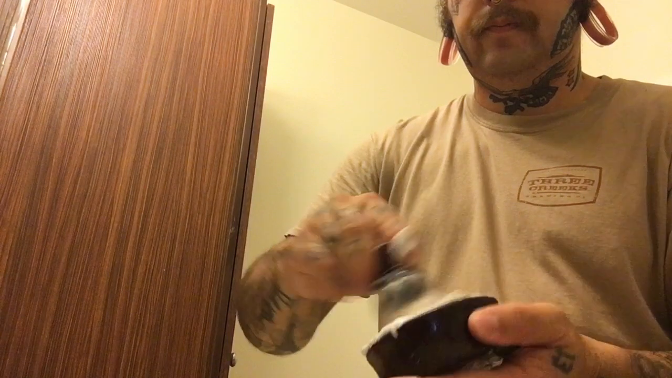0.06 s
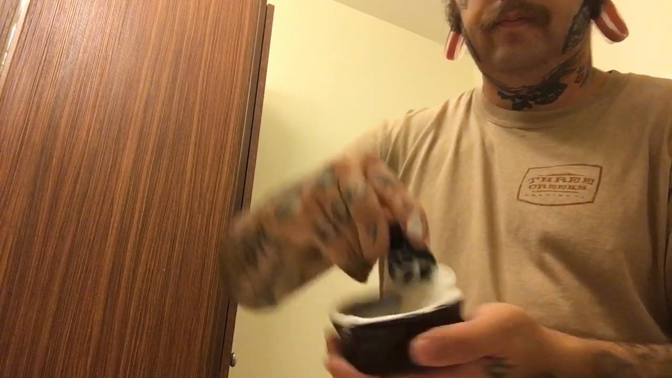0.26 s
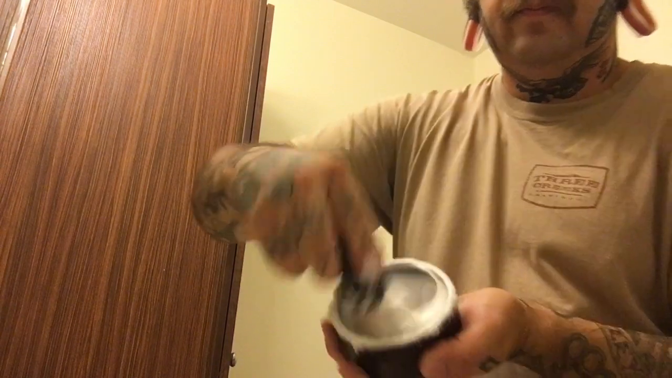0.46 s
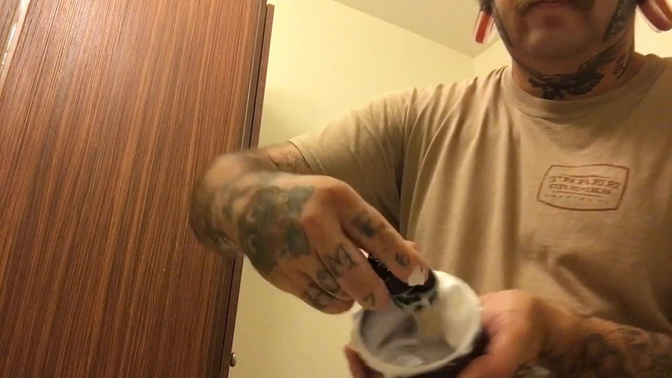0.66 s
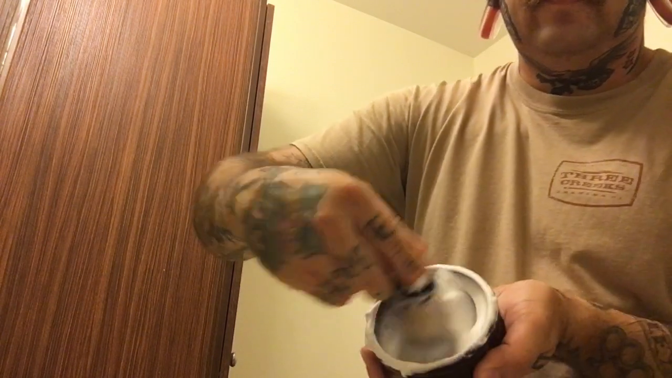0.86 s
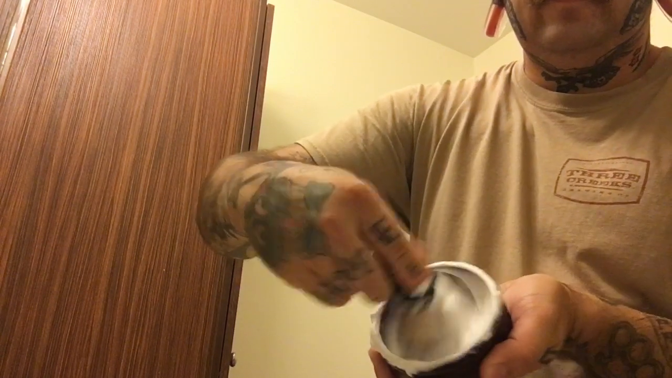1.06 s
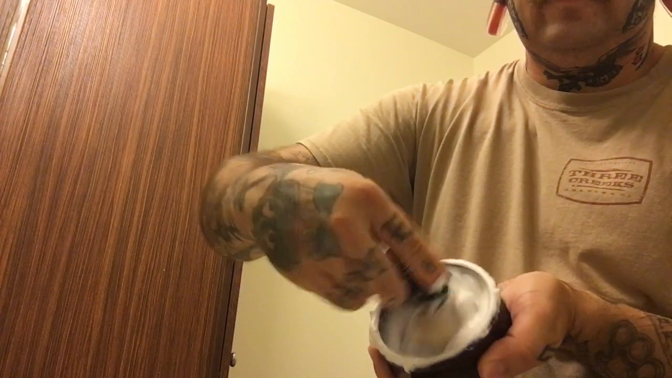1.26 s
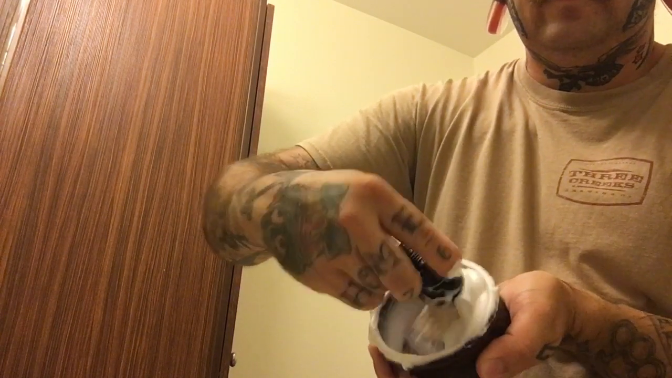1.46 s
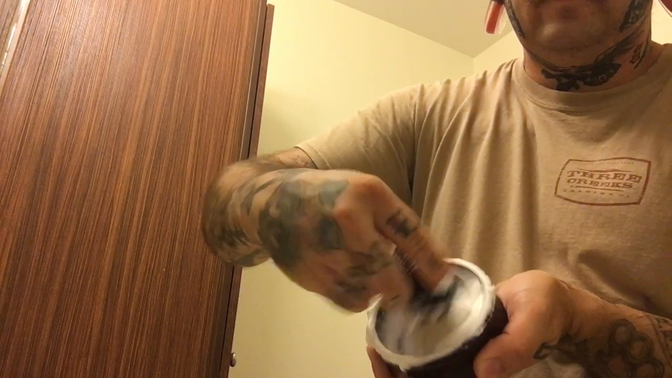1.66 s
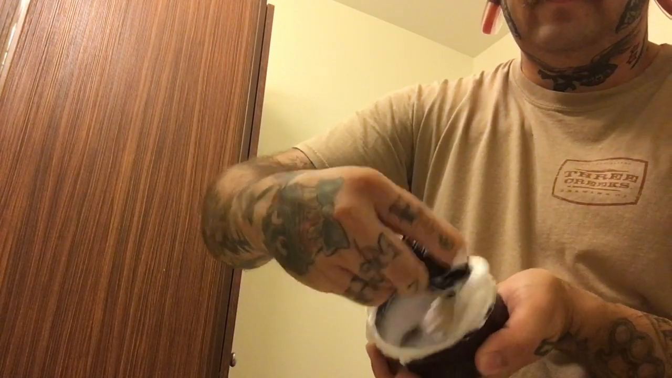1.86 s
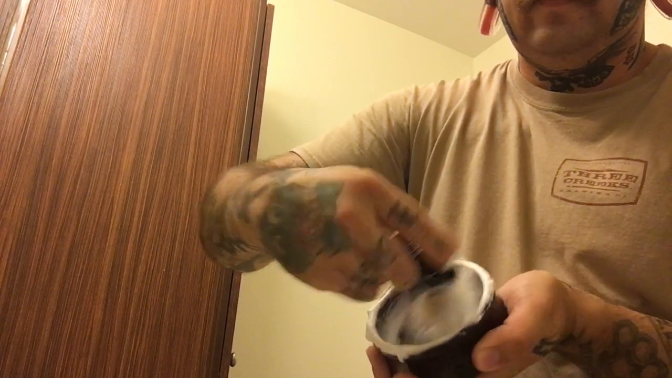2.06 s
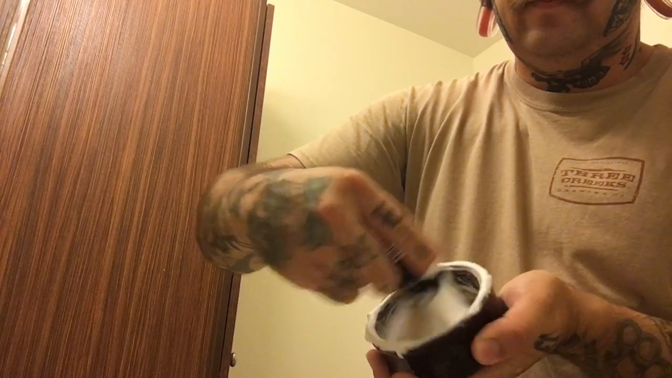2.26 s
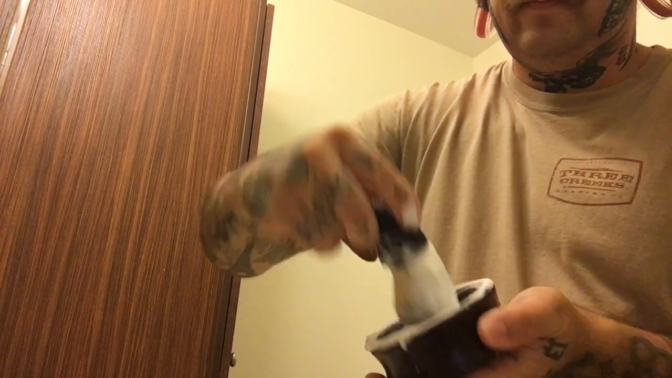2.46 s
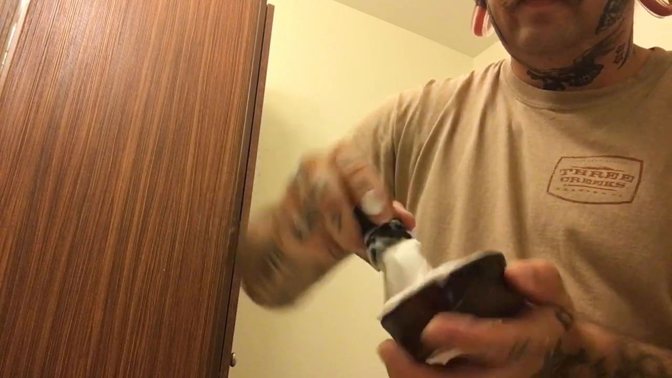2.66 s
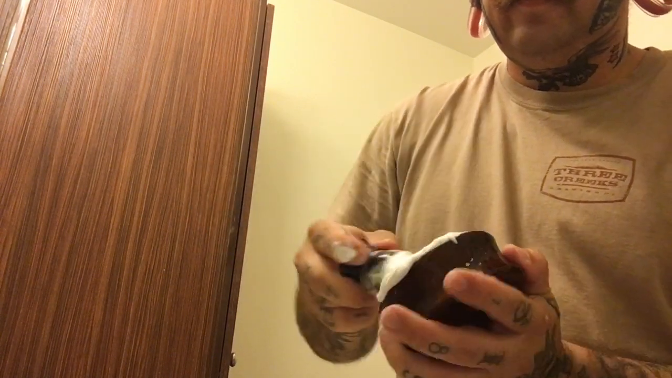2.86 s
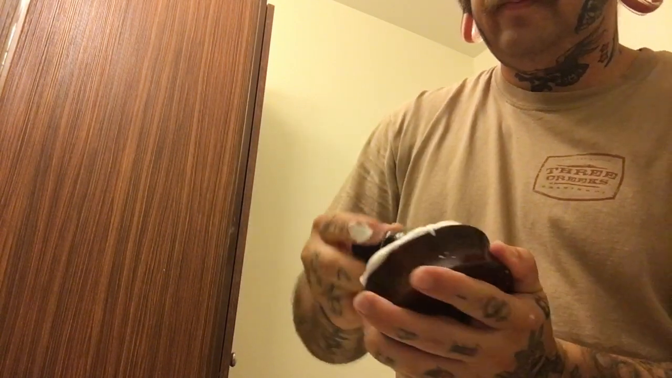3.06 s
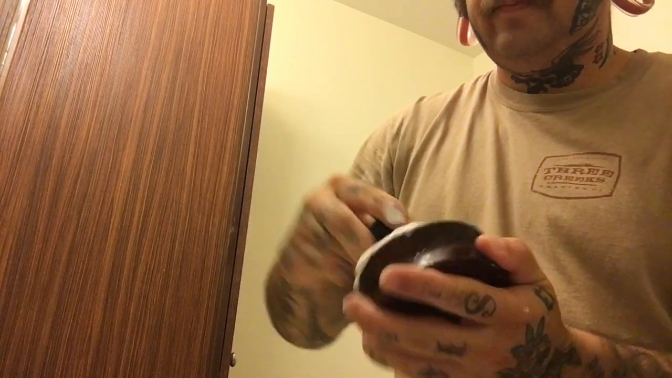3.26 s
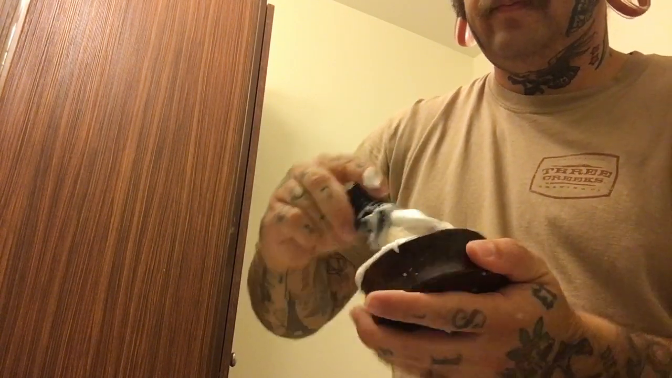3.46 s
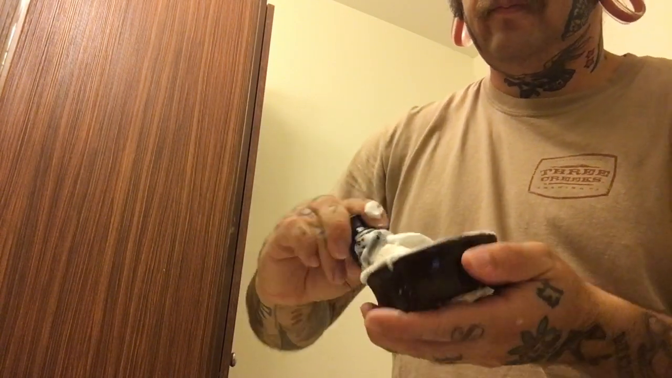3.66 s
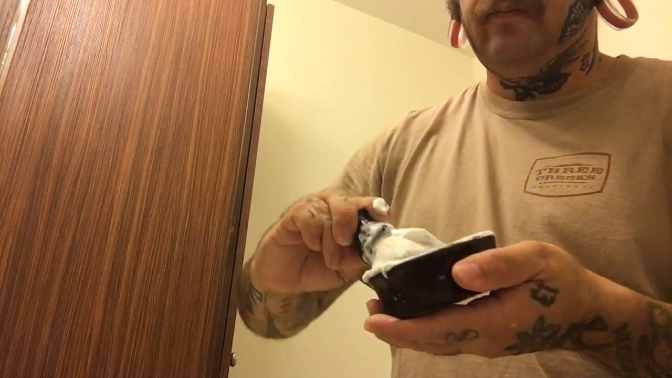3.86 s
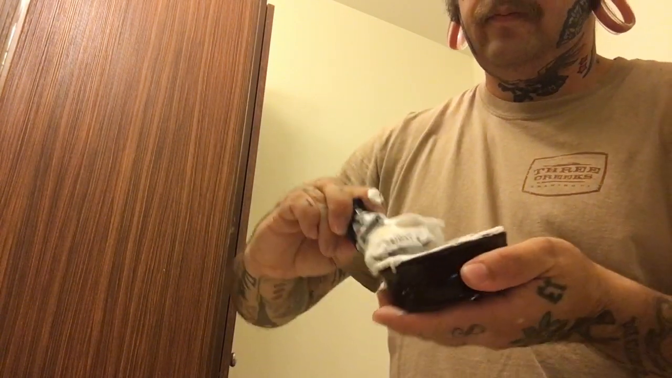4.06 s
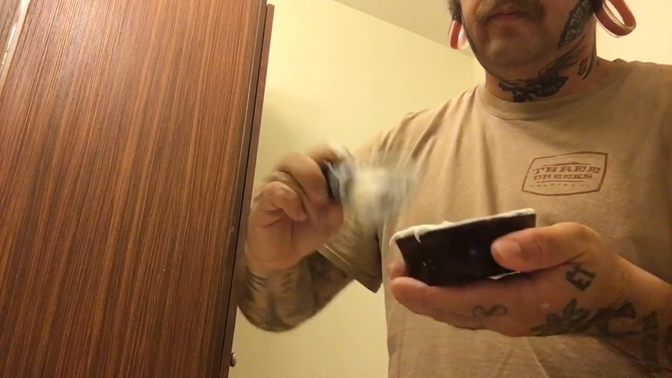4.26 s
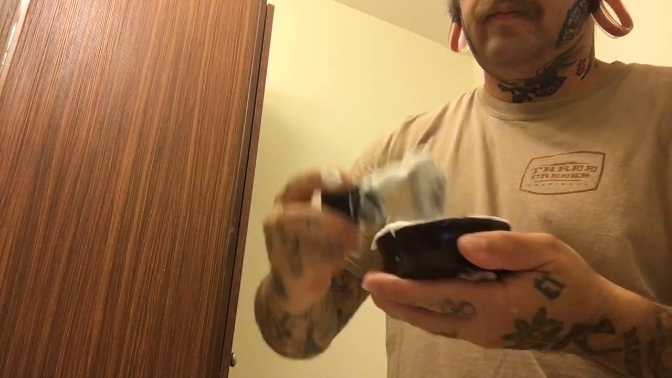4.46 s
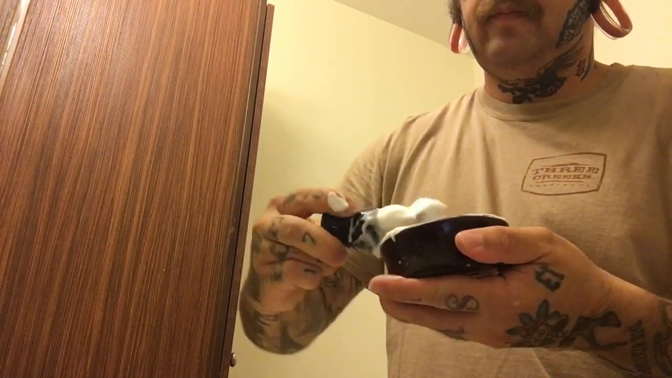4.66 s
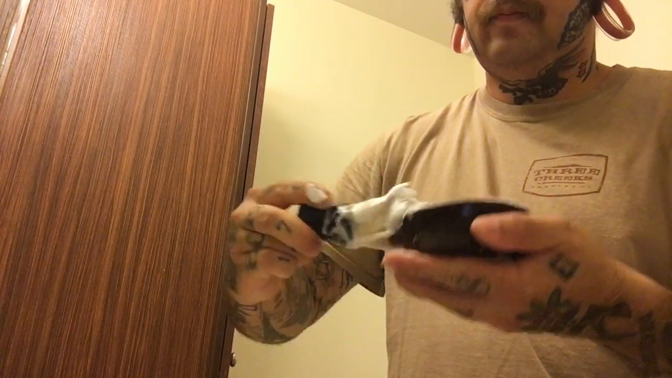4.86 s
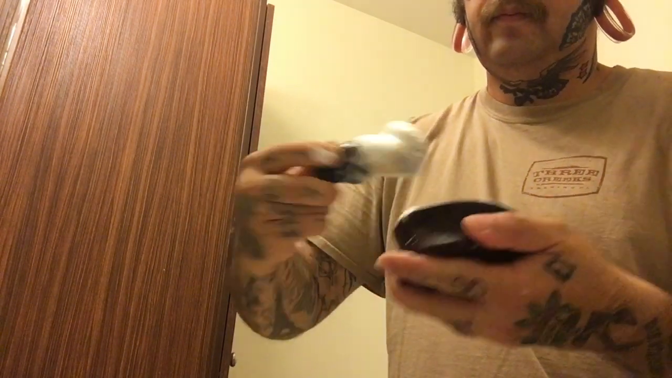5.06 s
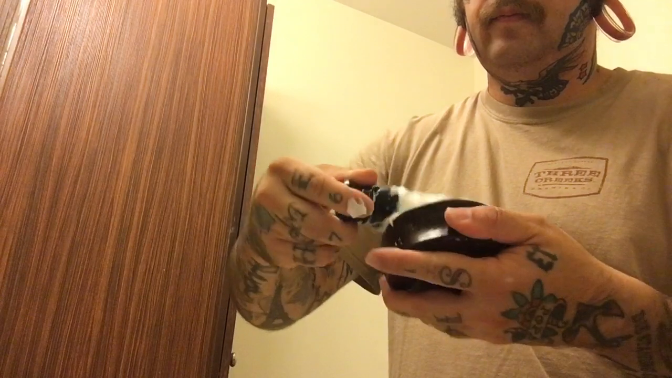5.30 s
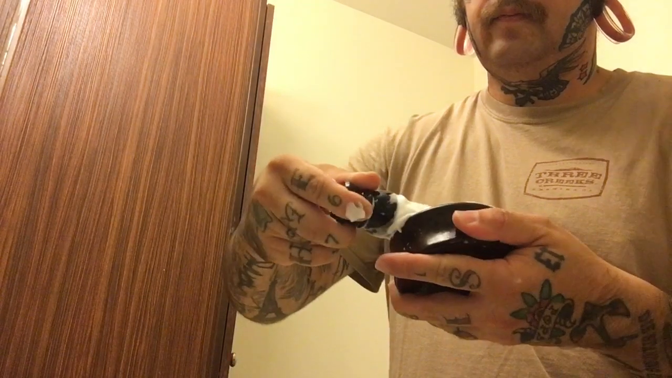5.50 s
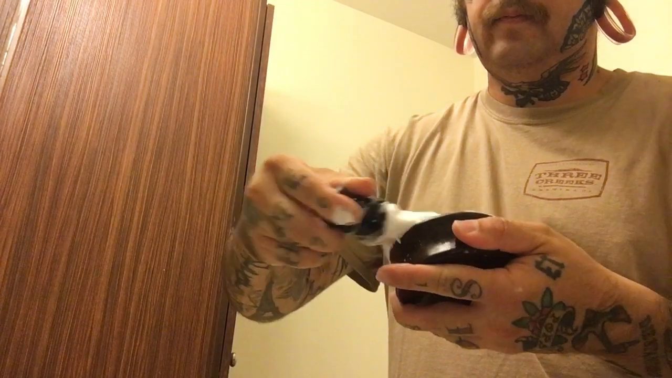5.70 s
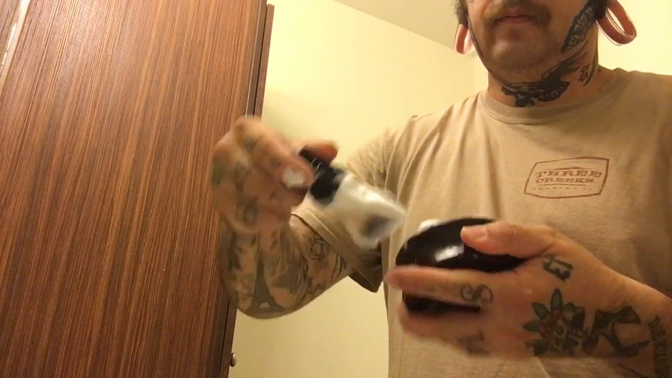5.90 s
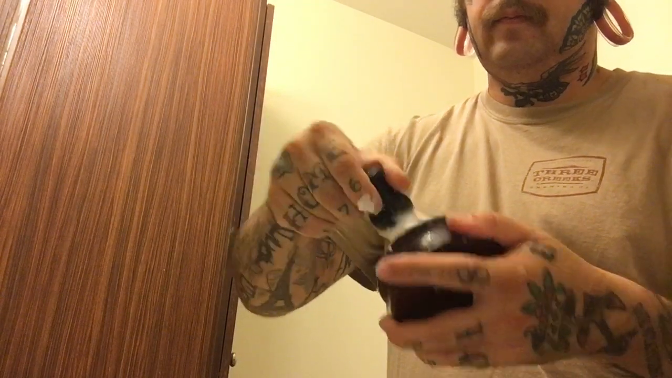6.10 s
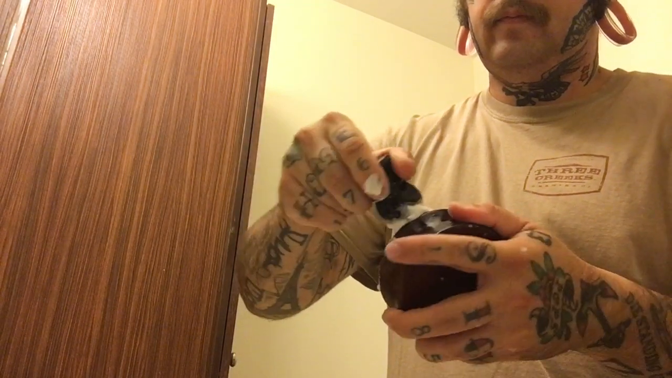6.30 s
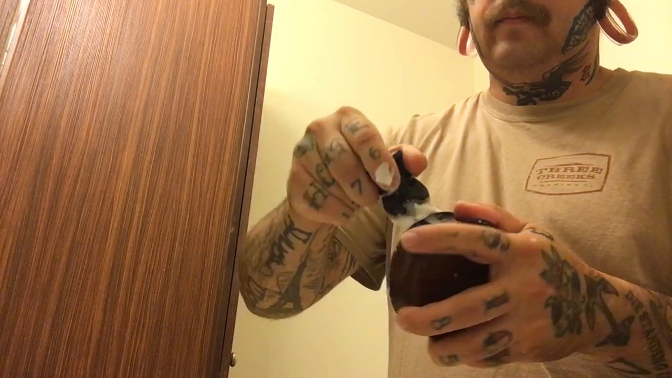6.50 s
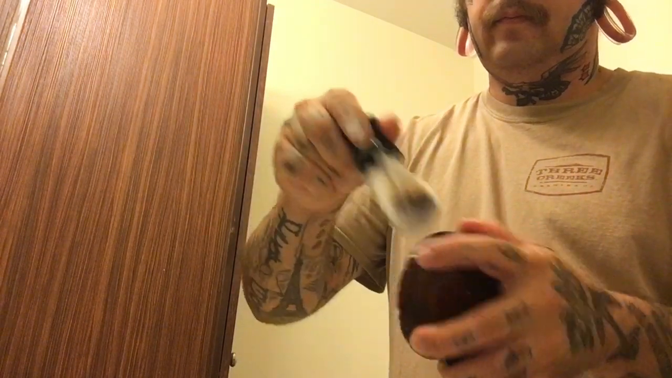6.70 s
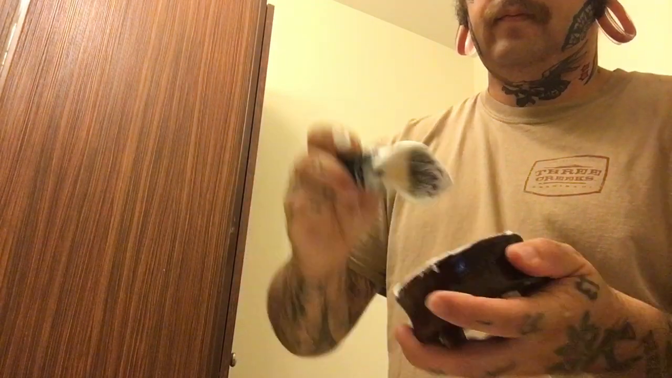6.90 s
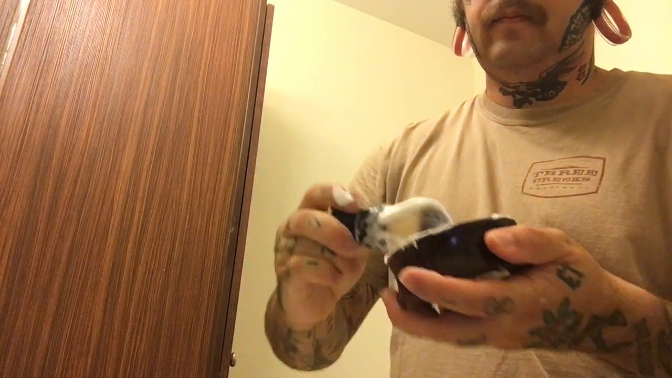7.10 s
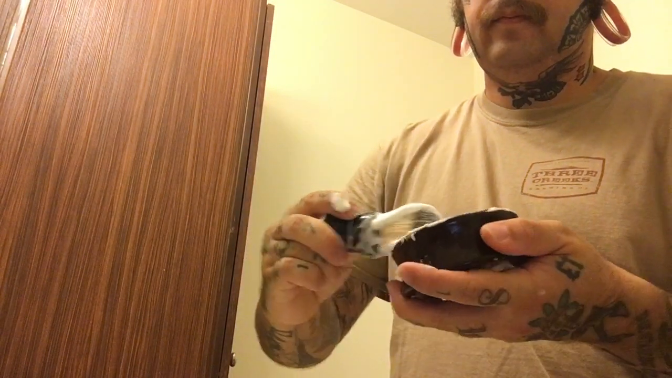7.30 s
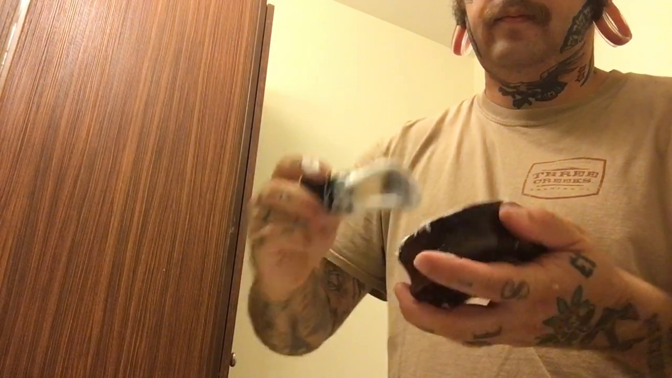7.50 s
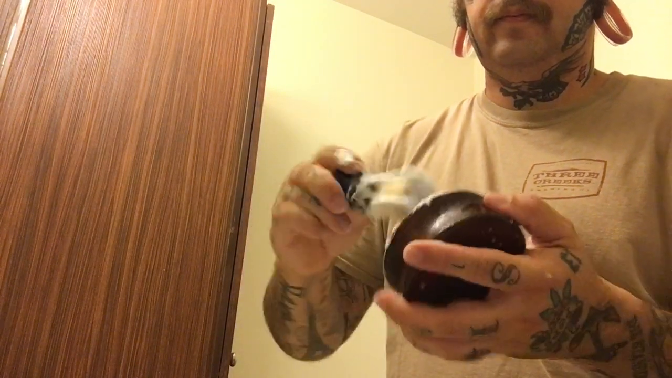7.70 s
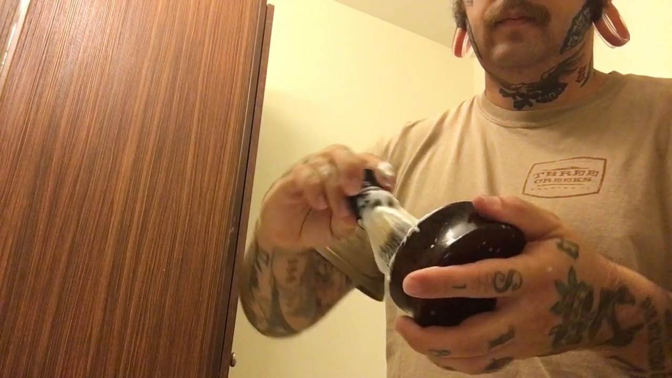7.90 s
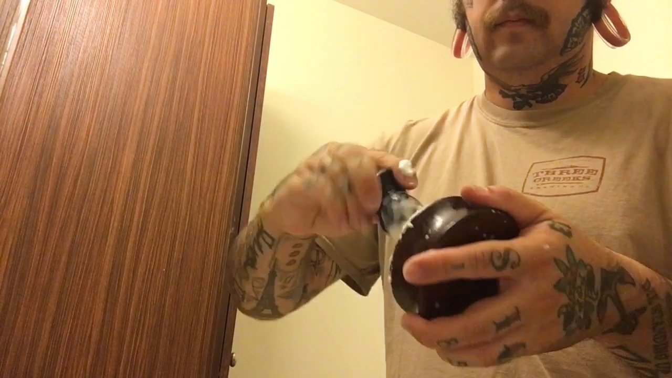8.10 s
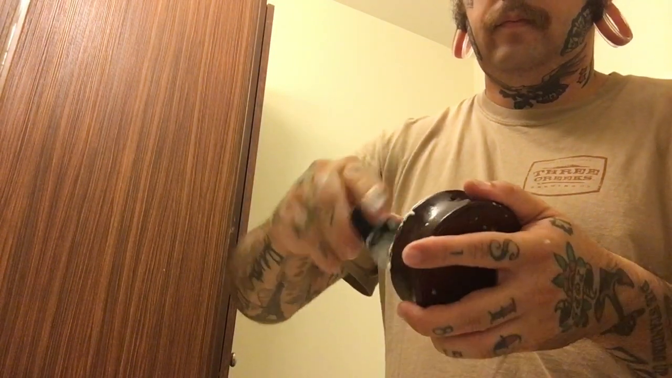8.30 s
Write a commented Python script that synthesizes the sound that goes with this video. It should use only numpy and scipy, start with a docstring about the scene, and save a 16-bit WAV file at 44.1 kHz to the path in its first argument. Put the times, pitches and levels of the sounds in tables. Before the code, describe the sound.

A shaving brush stirs lather in a hand-held wooden bowl, squelching and fizzing softly while its handle clacks against the side three times. The stirring dies away. Then the handle raps the rim five times, about a second apart, loud and hollow, with faint wet wipes of the bristles in between. The sounds are close, in a small, echoing bathroom with a faint electrical hum.

```python
"""A shaving brush whips lather in a hand-held wooden bowl, in a small live bathroom.
First the bristles squelch and fizz through the foam, and the handle glances off the bowl.
The bowl is tipped and the whisking dies away as a low mains hum swells. Then the handle is rapped
on the rim five times, each impact exciting the damped modes of the wood and the room; after each rap
the wet bristles are wiped across the edge, while a faint whine rises behind."""
import sys
import numpy as np
from scipy import signal
from scipy.fft import rfft, irfft, next_fast_len
from scipy.io import wavfile
from scipy.ndimage import uniform_filter1d, minimum_filter1d, map_coordinates

SR = 44100
rng = np.random.default_rng(int(sys.argv[2]) if len(sys.argv) > 2 else 0)


def store_wav(level_fs):
    """Save 16-bit WAV to argv[1]."""
    pcm = np.round(np.clip(np.atleast_2d(level_fs), -1, 1) * 32767)
    wavfile.write(sys.argv[1], SR, pcm.T.astype(np.int16))


N = 368144

# handle glancing off the wall: start_s, level_db, pitch_hz, ring_length_ratio, crack_db, room_db
WALL_GLANCES = [(0.18, -31.5, 1550, 0.76, -28, -6.5), (0.424, -46, 1490, .7, -24, -1),
                (0.591, -16, 1515, 0.44, -14, -5), (0.8769, -19.5, 1500, 0.18, -21, -5),
                (1.1321, -13.5, 1265, 0.11, -13, -6.5), (2.18, -40.5, 1660, .4, -24, -5.5),
                (2.254, -40, 1720, .6, -13, 0), (2.913, -50, 1300, 1, -4, 4),
                (3.293, -46, 1320, 1.2, -13.5, -5.5), (3.375, -50, 1566, 1.2, -13, -7),
                (3.4, -52.5, 1316, 0.78, -15.5, -2), (3.455, -52, 1355, 0.75, -12, -4)]
# handle rapped on the rim, where each spot has its own ping: start_s, level_db, pitch_hz, decay_s,
# ring_db, ring_length_ratio, crack_db, ping_hz, ping_db, room_db
RIM_RAPS = [(3.676, -5.5, 1343, 0.00026, -16, 0.63, -27.5, 6000, -42, -6.5),
            (4.634, -3.5, 1446, 0.00026, -21, 2.64, -26.5, 4200, -45, -1),
            (5.334, -10, 1265, 0.00033, -5.5, 1.7, -15.5, 2900, -36.5, -1.5),
            (6.276, -4.5, 1170, 0.00027, -12, 0.9, -26.5, 4090, -24, -7.5),
            (7.2614, -19, 1025, 0.00048, -23, 0.87, -33.5, 2330, -31.5, -4)]
# modes of the bowl, damped by the palm: frequency_hz, level_db, base_t60_s
BOWL_MODES = [(750.6, -37.5, .03), (950, -35, 0.038), (1100, -10.5, 0.012), (1160, -6, 0.059),
              (1264, -20, 0.028), (1432, 2.5, 0.017), (1720, -3.5, 0.022), (1847, -2, 0.025),
              (1980, -10, 0.02), (2162, 8, 0.0083), (2343, -6, 0.032), (2505, -7, 0.012), (2750, -14, 0.02),
              (2990, -4.5, 0.0097), (3983, -15.5, .016), (5860, -11.5, .014)]
# dry crack of the contact: frequency_hz, gain_db
CRACK_SPECTRUM = [(150, -13.5), (700, -6.5), (1500, 6), (2300, 2), (2700, 8), (3050, 16), (3550, 3.5),
                  (4200, 8), (5100, 2), (6000, 3.5), (7500, -4.5), (9500, -11.5), (10500, -18),
                  (15000, -21)]
# direct radiation of the bowl, whose two faces cancel in the bass: frequency_hz, gain_db
BOWL_RADIATION = [(100, -13.5), (380, 0.5), (560, -16.5), (850, -6), (1080, 4.5), (1400, 0.5), (15000, -2)]

# strokes through the lather: peak_s, half_length_s, squelch_db, fizz_db
BRUSH_STROKES = [(0.0, 0.033, -59.5, -60), (0.133, 0.048, -51.5, -76.5), (0.208, 0.032, -54.5, -57),
                 (0.527, 0.046, -53.5, -72), (0.677, .05, -57.5, -71.5), (0.785, .06, -51, -62),
                 (0.92, 0.065, -55.5, -88), (1.055, 0.033, -47.5, -57.5), (1.286, .08, -53, -63.5),
                 (1.449, 0.037, -49.5, -63), (1.494, 0.028, -56, -62.5), (1.61, 0.065, -56, -69),
                 (1.77, 0.037, -51.5, -64.5), (1.926, 0.033, -56, -80), (2.067, 0.099, -52, -63),
                 (2.28, 0.12, -51, -63), (2.432, 0.058, -51.5, -66), (2.771, 0.036, -71, -74),
                 (2.96, 0.032, -53.5, -65), (3.082, 0.088, -56.5, -71.5), (3.26, 0.15, -64, -74),
                 (3.389, .03, -62.5, -72)]
# the bowl is tipped and the brush moves up to its wall: time_s, scrape_fraction
BOWL_TILT = [(2.6, 0.21), (2.85, 0.85)]
# lather in the hollow of the bowl: frequency_hz, density_db
SQUELCH_SPECTRUM = [(200, -22), (650, -22), (950, -8), (1250, -7), (1650, 2), (2100, -9.5), (2500, -9),
                    (3000, -5.5), (3900, -15), (5000, -27.5), (8000, -34)]
# bristles scraping the tipped wall: frequency_hz, density_db
SCRAPE_SPECTRUM = [(200, -34), (700, -20.5), (1000, -8.5), (1280, 2), (1700, -9), (2200, -8.5),
                   (2700, -13.5), (3300, -11.5), (4000, -27), (8000, -34.5)]
# fine bubbles bursting: frequency_hz, density_db
FIZZ_SPECTRUM = [(1500, -29), (3200, -6.5), (4200, 4), (5000, -0.5), (6200, 0), (8000, -6), (9500, -7),
                 (10500, -13.5), (12000, -11), (15500, -18.5)]
# bristles drawn over the rim: peak_s, swish_db, rise_s, foam_db
RIM_WIPES = [(3.975, -63.5, .04, -73), (4.068, -57.5, 0.077, -73.5), (4.265, -61.5, 0.13, -74.5),
             (4.935, -53, 0.06, -61.5), (5.874, -56, 0.095, -65.5), (6.72, -59, 0.2, -70.5),
             (7.45, -59.5, 0.12, -79)]
# friction of the wet tuft: frequency_hz, density_db
SWISH_SPECTRUM = [(300, -6.5), (750, 4), (1200, 16), (1700, 9.5), (2500, 4), (4000, 2), (5000, -1.5),
                  (6300, 3), (8000, -5), (9500, -10), (10500, -14.5), (12000, -12), (15500, -17.5)]
# foam squeezed from the tuft: frequency_hz, density_db
FOAM_SPECTRUM = [(2000, -24), (5000, -7.5), (6500, 0), (9000, -2), (10500, -7), (14500, -2)]

# colour of the reverberation: frequency_hz, gain_db
ROOM_SPECTRUM = [(100, -7.5), (220, -5), (310, 5.5), (390, 6), (455, 6.5), (530, -6.5), (640, 5), (730, 4),
                 (850, 2), (1120, 6.5), (1600, -3), (2200, 5.5), (2800, 4), (4200, 4.5), (14000, 0.5)]
# reverberation time: frequency_hz, t60_s
ROOM_DECAY = [(200, 0.96), (500, 0.97), (1100, 0.64), (2200, 0.61), (4500, 0.65), (12000, 0.95)]
# standing waves between the hard walls: frequency_hz, level_db, t60_s
ROOM_MODES = [(316, -28.5, .8), (457, -30.5, 0.8), (731, -29, .8), (1072, -32, .7), (1106, -30.5, 0.57),
              (1154, -32, .7), (1385, -29, 0.57), (1822, -29, 0.52), (2233, -28.5, .6), (2303, -28.5, .6)]
# noise of the still room: frequency_hz, density_db
AIR_SPECTRUM = [(22, -34.5), (42, -6.5), (65, -7), (88, -14), (125, -13), (195, -9), (255, -18),
                (320, -13.5), (500, -19.5), (650, -22.5), (1100, -30), (4500, -37.5), (9000, -45),
                (15500, -49.5)]
# fundamental of the mains hum: time_s, level_db
HUM_LEVELS = [(0, -90), (2.45, -85), (2.8, -63.5), (5.2, -62.5), (8.35, -66.5)]
# faint drone that fades away: time_s, level_db
DRONE_LEVELS = [(0, -77), (0.5, -67.5), (0.9, -72), (1.5, -76), (2.2, -87)]
# faint whine that comes in late: time_s, level_db
WHINE_LEVELS = [(0, -118), (4.1, -86.5), (4.4, -70.5), (6.0, -78), (7.1, -71.5), (7.5, -61.5), (7.8, -79)]

TOUCH_LEAD_S, TOUCH_DB, TOUCH_ROOM_DB = .022, -50, 5.5  # a light touch just ahead of each rap
RAP_CUTOFF_HZ, PING_T60_S = 2200, .0088
CRACK_RISE_S, CRACK_T60_S, SPLASH_DB = .00031, .017, 15
THUD_HZ, THUD_DECAY_S, THUD_DB = 350, .0013, -19
CHURN_DB, CHURN_FIZZ_DB = -64, -73.5  # between strokes the bristles stay in the lather
LIFT_S, LIFT_DB_PER_S = 2.49, 46.5  # the brush is lifted out and the churning fades
FIZZ_LAG_S, FOAM_LAG_S = .008, .012  # bubbles burst just after the push, or as the tuft slips off
WIPE_RELEASE_S, DRAG_DB = .049, -14  # the tuft slips off quickly; a faint drag surrounds each wipe


def handle_impacts():
    """Impact excitation: long, soft glances while stirring, then firm raps, each after a light touch."""
    track = np.zeros(N)
    for start_s, level_db, pitch_hz, ring_length, crack_db, room_db in WALL_GLANCES:
        glance = impact(pitch_hz, decay_s=.00067, ring_db=-13, ring_length=ring_length,
                        crack_db=crack_db, ping_hz=2860, ping_db=-37, room_db=room_db, cutoff_hz=1946)
        add(track, start_s, amp(level_db) * glance)
    for start_s, level_db, *contact, room_db in RIM_RAPS:
        touch = impact(*contact, TOUCH_ROOM_DB, RAP_CUTOFF_HZ)
        add(track, start_s - TOUCH_LEAD_S, amp(TOUCH_DB) * touch)
        add(track, start_s, amp(level_db) * impact(*contact, room_db, RAP_CUTOFF_HZ))
    return track


def impact(pitch_hz, decay_s, ring_db, ring_length, crack_db, ping_hz, ping_db, room_db, cutoff_hz):
    """Superposition of direct and reverberant sound from one contact of handle and bowl."""
    t = np.arange(SR // 8) / SR
    onset = np.minimum(t / CRACK_RISE_S, 1)
    ping = amp(ping_db - 60 * t / PING_T60_S) * onset * np.sin(2 * np.pi * ping_hz * t)
    wood = bowl_vibration(pitch_hz, decay_s, ring_db, ring_length, cutoff_hz) + ping
    burst = rng.standard_normal(len(t)) * amp(-60 * t / CRACK_T60_S) * onset
    crack = coloured(burst, CRACK_SPECTRUM)
    # the crack as an impulse, to be spread evenly over the room
    splash = amp(SPLASH_DB) * coloured(signal.unit_impulse(len(t)), CRACK_SPECTRUM)
    # the whole bowl recoils in the palm: a low thud heard by way of the walls
    thud_envelope = t / THUD_DECAY_S * np.exp(1 - t / THUD_DECAY_S)
    thud = thud_envelope * np.sin(2 * np.pi * THUD_HZ * (t - THUD_DECAY_S))
    recoil = amp(THUD_DB) * thud * (decay_s / THUD_DECAY_S) ** .72  # a longer contact shoves harder
    sound = bathroom(amp(room_db) * (wood + amp(crack_db) * splash) + recoil)
    add(sound, 0, coloured(wood + amp(crack_db) * crack, BOWL_RADIATION))
    return sound


def bowl_vibration(pitch_hz, decay_s, ring_db, ring_length, cutoff_hz, seat_s=.0005):
    """Forced, then free vibration: a hollow clack of a few cycles and a ring of damped modes."""
    t = np.arange(SR // 8) / SR
    age = t / decay_s
    clack = (age / 2) ** 2 * np.exp(2 - age) * np.sin(2 * np.pi * pitch_hz * (t - seat_s))
    ring_t = np.maximum(t - seat_s, 0)  # the wood rings once the handle has seated on it
    ring = sum(amp(db + rng.normal(0, 1) - 60 * ring_t / (t60 * ring_length))
               * np.sin(2 * np.pi * hz * ring_t) for hz, db, t60 in BOWL_MODES)
    ring = signal.lfilter(*signal.butter(2, cutoff_hz, fs=SR), ring)  # soft contact spares high modes
    wood = clack + amp(ring_db) * ring
    return coloured(wood, [(100, -14), (600, -6.5), (3000, 2), (4500, -13), (12000, -36)])


def whisking():
    """Cavity resonance: coarse pops of torn lather sound the bowl's hollow while fine bubbles fizz."""
    _, _, squelch_db, fizz_db = np.transpose(BRUSH_STROKES)
    tilt = timeline(BOWL_TILT)
    drag_db = 2 * wobble(110)  # tufts catch and let go
    pops = crackle(per_second=900, spread_db=4, hiss_db=-2)
    hollow = unit(coloured(pops, SQUELCH_SPECTRUM))
    scrape = unit(coloured(pops, SCRAPE_SPECTRUM))
    squelch = (1 - tilt) * hollow + tilt * scrape
    fizz = unit(coloured(crackle(per_second=3000, spread_db=4.5, hiss_db=2), FIZZ_SPECTRUM))
    return (amp(drag_db) * stirring(squelch_db, CHURN_DB, 0) * squelch
            + amp(.5 * drag_db) * stirring(fizz_db, CHURN_FIZZ_DB, FIZZ_LAG_S) * fizz)


def stirring(levels_db, churn_db, lag_s):
    """Incoherent sources add in power: the joint gain of the strokes and the churning under them."""
    churn = amp(churn_db - LIFT_DB_PER_S * np.maximum(np.arange(N) / SR - LIFT_S, 0))
    strokes = (amp(db) * swell(peak_s + lag_s, half_s, half_s)
               for (peak_s, half_s, *_), db in zip(BRUSH_STROKES, levels_db))
    return np.sqrt(churn ** 2 + sum(stroke ** 2 for stroke in strokes))


def wiping():
    """Friction noise: wet bristles bend over the rim, slip off and shed bursting foam."""
    swish = unit(coloured(crackle(per_second=820, spread_db=5, hiss_db=0), SWISH_SPECTRUM))
    foam = unit(coloured(crackle(per_second=1200, spread_db=4.5, hiss_db=-.5), FOAM_SPECTRUM))
    swish_power, foam_gain = 0, 0
    for peak_s, swish_db, rise_s, foam_db in RIM_WIPES:
        drag = amp(DRAG_DB) * swell(peak_s, rise_s=.3, fall_s=.16, shape=2)
        swish_power += amp(swish_db) ** 2 * (swell(peak_s, rise_s, WIPE_RELEASE_S) ** 2 + drag ** 2)
        foam_gain += amp(foam_db) * swell(peak_s + FOAM_LAG_S, rise_s, WIPE_RELEASE_S)
    return amp(.8 * wobble(42)) * (np.sqrt(swish_power) * swish + foam_gain * foam)


def crackle(per_second, spread_db, hiss_db):
    """Shot noise: tiny independent pops of unequal size over a smooth hiss."""
    pops = (rng.random(N) < per_second / SR) * rng.choice([-1, 1], N)
    sizes = amp(spread_db * np.clip(rng.standard_normal(N), -2, 2))
    return unit(unit(pops * sizes) + amp(hiss_db) * rng.standard_normal(N))


def bathroom(x, early_db=3, early_t60_s=.15, build_s=.0018):
    """Reverberation: strong early reflections off near walls, a diffuse tail and standing waves."""
    hz, t, noise = signal.stft(rng.standard_normal(SR * 3 // 4), SR, nperseg=256)
    diffuse = amp(-60 * t / along(ROOM_DECAY, hz)[:, None])
    early = amp(early_db - 60 * t / early_t60_s)
    tail = signal.istft(noise * (diffuse + early), SR, nperseg=256)[1]
    t = np.arange(len(tail)) / SR
    tail = unit(tail * (1 - np.exp(-(t / build_s) ** 2)))
    tail += sum(amp(db) * unit(amp(-60 * t / t60) * np.sin(2 * np.pi * hz * t))
                for hz, db, t60 in ROOM_MODES)
    return signal.fftconvolve(x, coloured(tail / np.linalg.norm(tail), ROOM_SPECTRUM))


def background():
    """Slow frequency modulation: mains hum, a fading drone and a faint whine waver over still air."""
    def tone(hz, waver_hz):
        return np.sqrt(2) * np.sin(2 * np.pi * np.cumsum(hz + waver_hz * wobble(8.5)) / SR)
    air = amp(-64) * unit(coloured(rng.standard_normal(N), AIR_SPECTRUM))
    hum = amp(timeline(HUM_LEVELS) + .87 * wobble(6)) * tone(59.2, waver_hz=.55)
    hum += amp(-72.5) * tone(118.6, waver_hz=.33)
    drone = amp(timeline(DRONE_LEVELS)) * tone(204, waver_hz=.57)
    whine = amp(timeline(WHINE_LEVELS) + 1.2 * wobble(6.7)) * tone(436, waver_hz=2.7)
    return air + hum + drone + whine


def amp(db):
    """Decibels to amplitude ratio."""
    return 10 ** (np.asarray(db) / 20)


def unit(x):
    """Normalisation to rms 1."""
    return x / np.sqrt(np.mean(x ** 2) + 1e-20)


def along(points, hz):
    """Interpolation of (frequency_hz, value) points on a log axis."""
    frequencies, values = np.transpose(points)
    return np.interp(np.log(hz + 1), np.log(frequencies + 1), values)


def timeline(points):
    """Linear interpolation of (time_s, value) points at every sample."""
    return np.interp(np.arange(N) / SR, *np.transpose(points))


def wobble(rate_hz):
    """Smooth random modulation: a spline through rate_hz knots a second."""
    knots = rng.standard_normal(int(N * rate_hz / SR) + 4)
    return map_coordinates(knots, [np.arange(N) * rate_hz / SR])


def swell(peak_s, rise_s, fall_s, shape=1.5):
    """An envelope that reaches 1 at peak_s; shape 1 is pointed, 2 is bell-shaped."""
    t = np.arange(N) / SR - peak_s
    return np.exp(-np.minimum(np.maximum(-t / rise_s, t / fall_s) ** shape, 20))


def coloured(x, spectrum):
    """Minimum-phase filtering by (frequency_hz, gain_db) points."""
    size = 2 * next_fast_len(len(x) // 2 + 4096)
    gain = amp(along(spectrum, np.fft.rfftfreq(size, 1 / SR)))
    cepstrum = irfft(np.log(gain), size)
    cepstrum[1:size // 2] *= 2  # folding the cepstrum makes the filter causal
    cepstrum[size // 2 + 1:] = 0
    return irfft(rfft(x, size) * np.exp(rfft(cepstrum)), size)[:len(x)]


def add(track, start_s, sound):
    """Superposition of a sound on a track from start_s."""
    part = track[round(start_s * SR):]
    part[:len(sound)] += sound[:len(part)]


def scene():
    """Pressures add: the nearby brush and bowl, their reverberation and the background, in mono."""
    lather = whisking() + wiping()
    return (handle_impacts() + lather + amp(-9.5) * bathroom(lather)[:N] + background())[None]


def record(dry, ceiling=.72, top_hz=15800):
    """Peak and band limiting: the gain ducks for the highest peaks and nothing passes above top_hz."""
    needed = ceiling / np.maximum(np.abs(dry), ceiling)
    gain = uniform_filter1d(minimum_filter1d(needed, size=65), size=65)
    size = next_fast_len(N + SR // 2)
    passband = np.fft.rfftfreq(size, 1 / SR) < top_hz
    return irfft(rfft(dry * gain, size) * passband, size)[:, :N]


dry = scene()
out = record(dry)
store_wav(out)
```